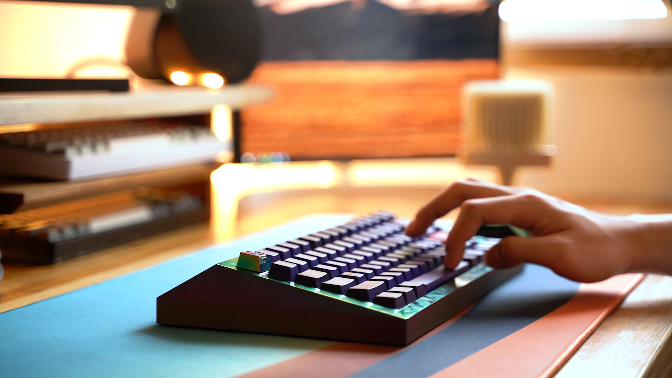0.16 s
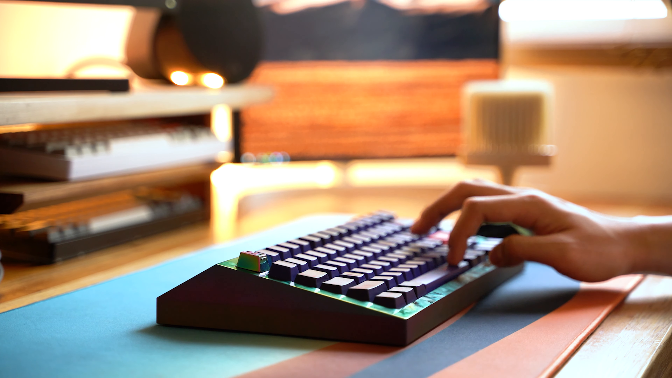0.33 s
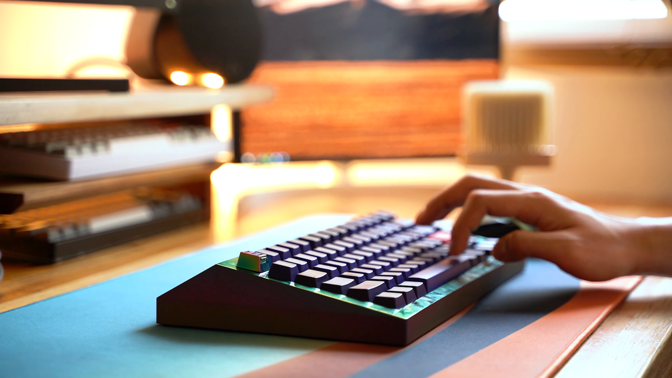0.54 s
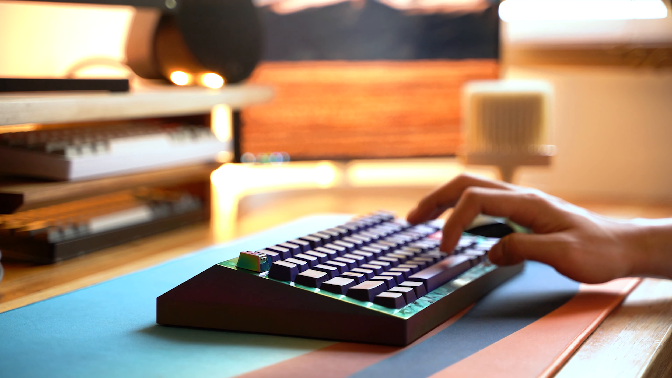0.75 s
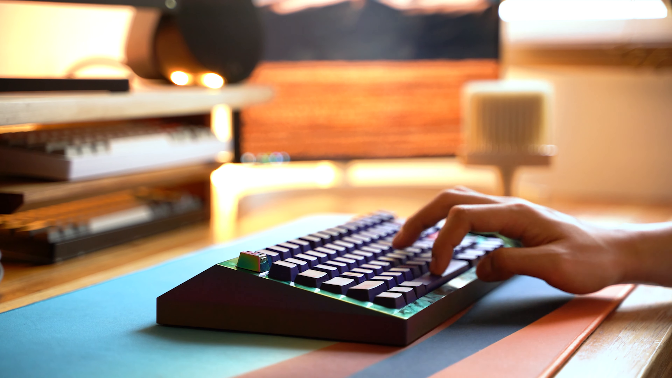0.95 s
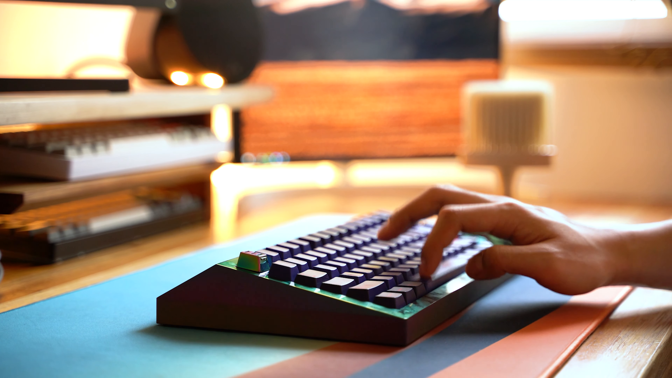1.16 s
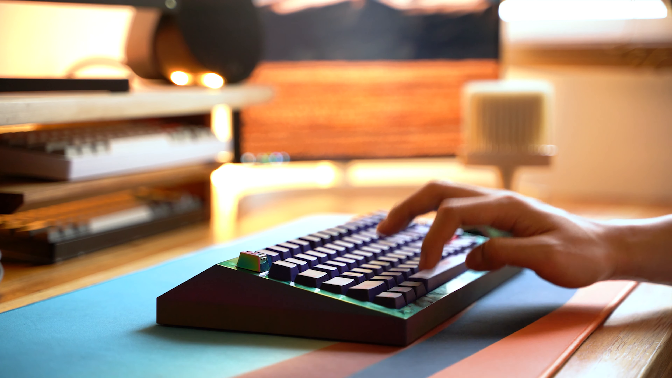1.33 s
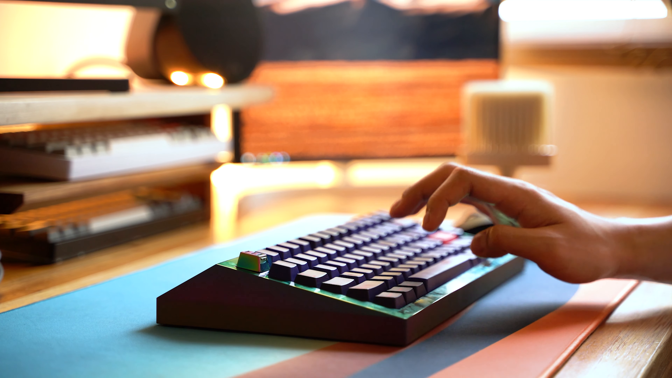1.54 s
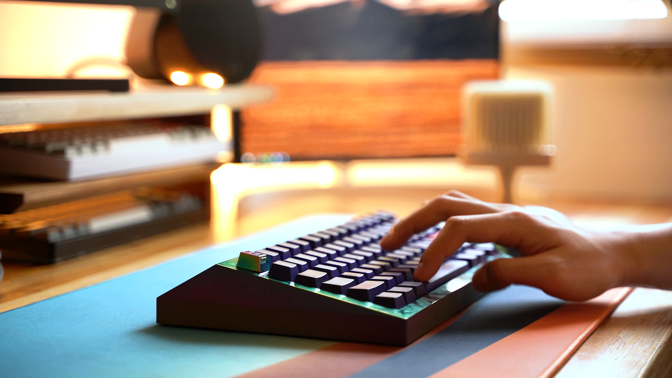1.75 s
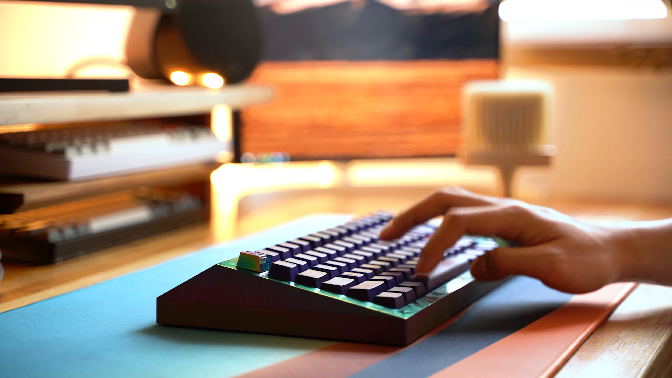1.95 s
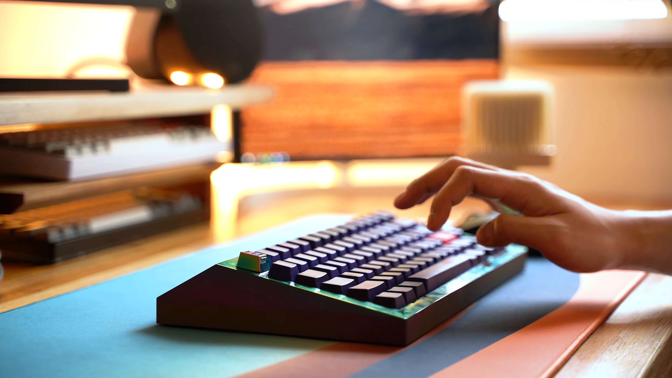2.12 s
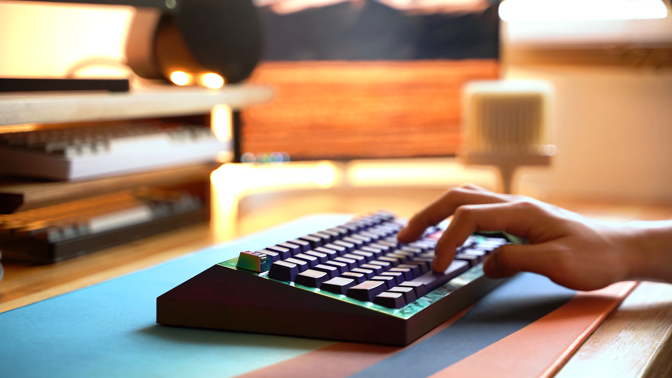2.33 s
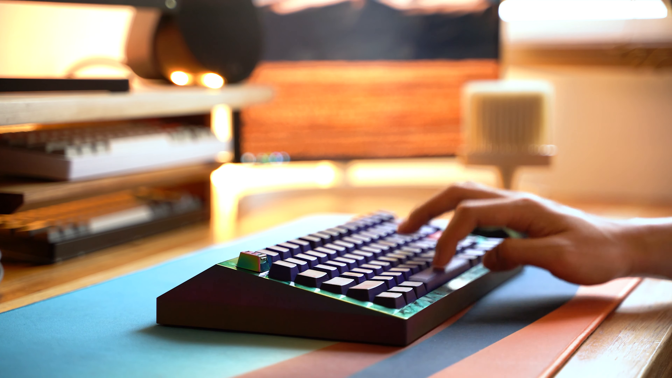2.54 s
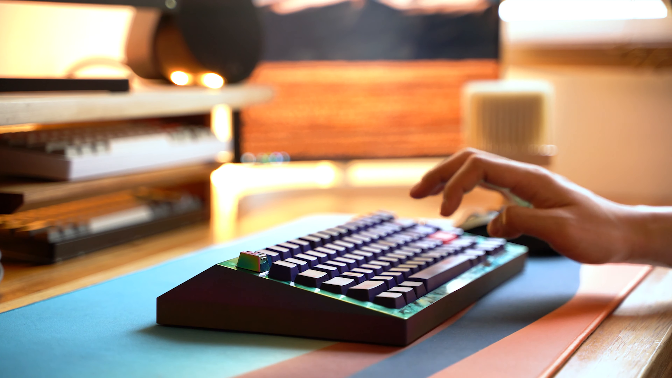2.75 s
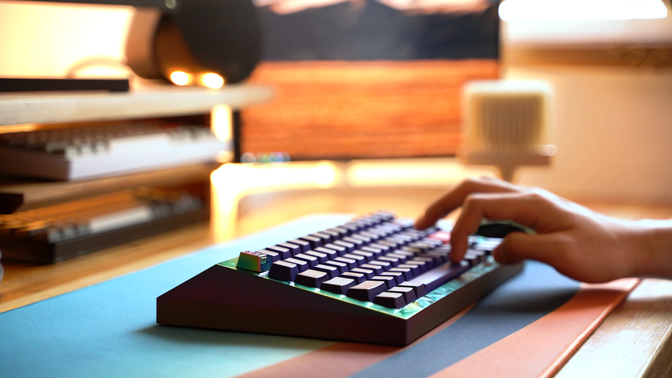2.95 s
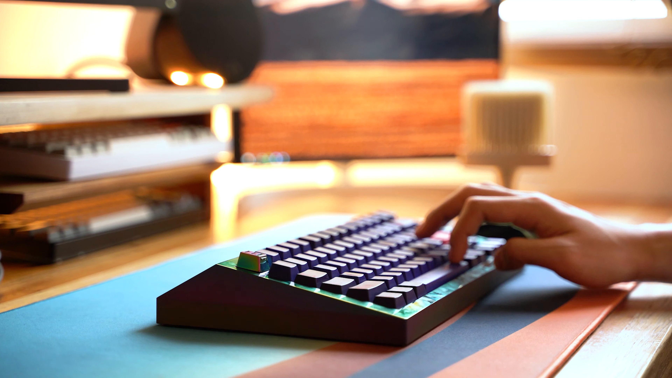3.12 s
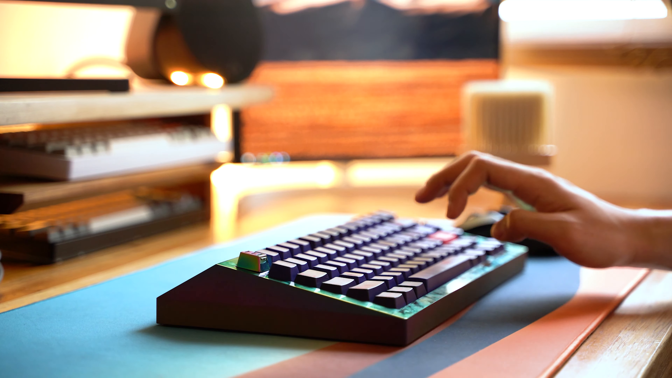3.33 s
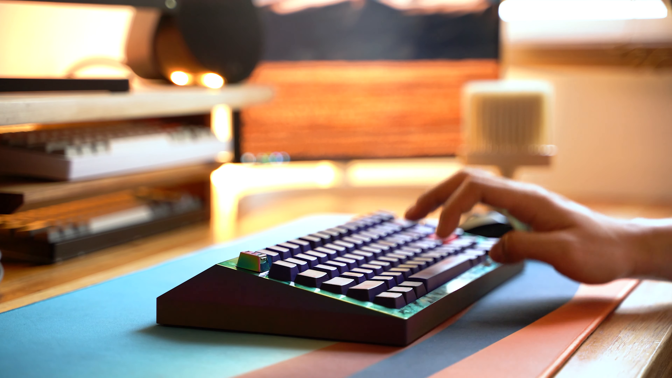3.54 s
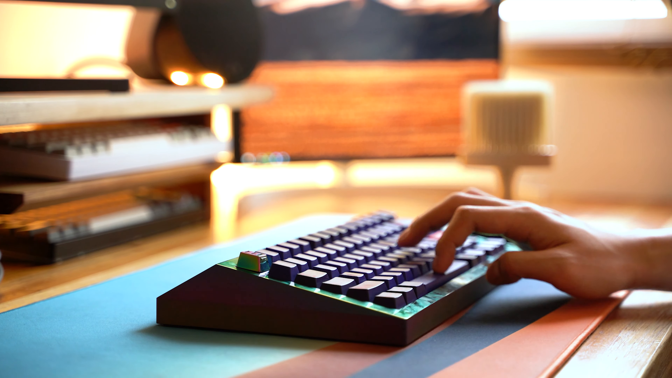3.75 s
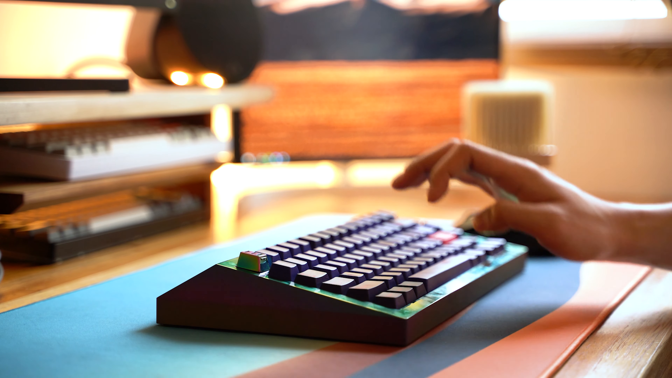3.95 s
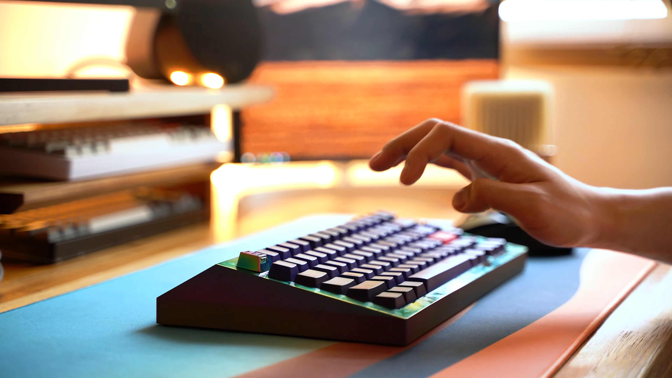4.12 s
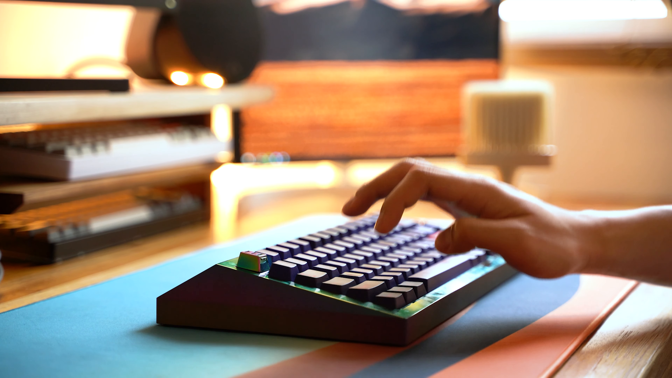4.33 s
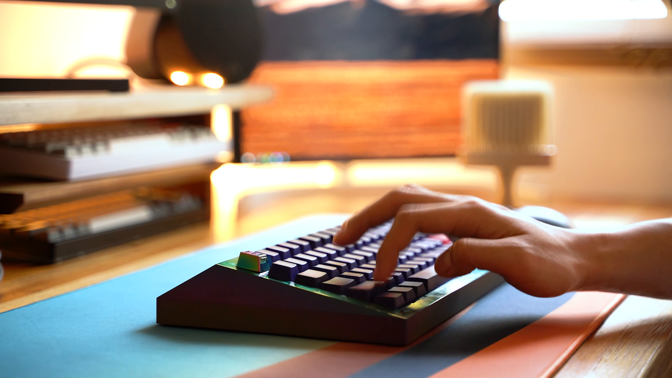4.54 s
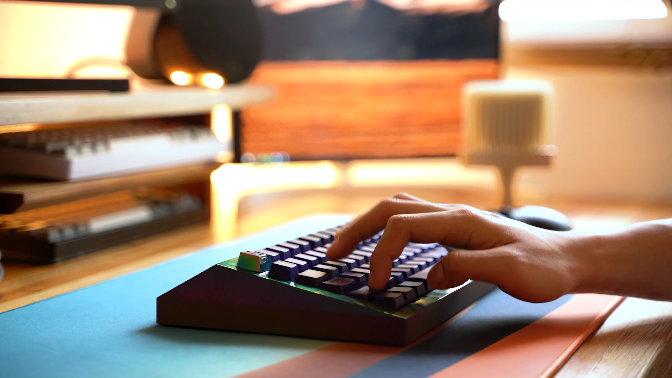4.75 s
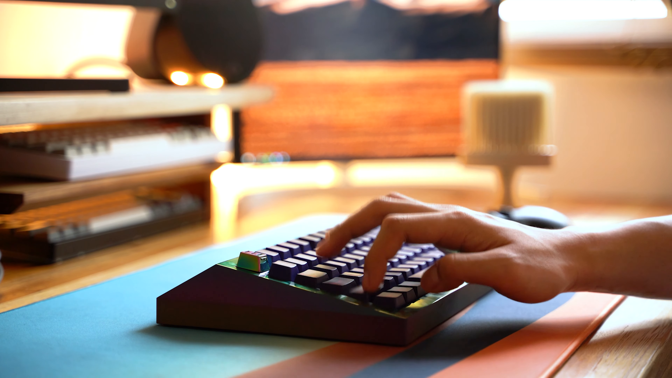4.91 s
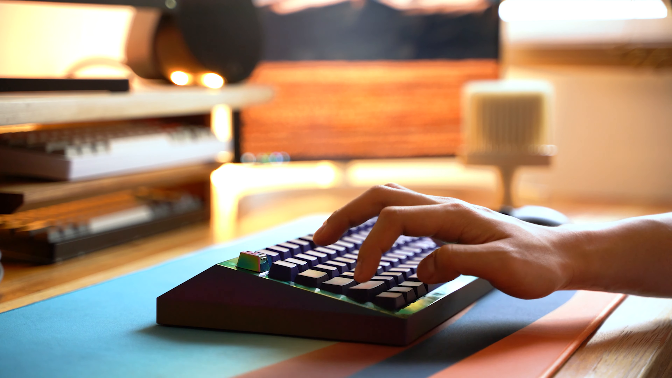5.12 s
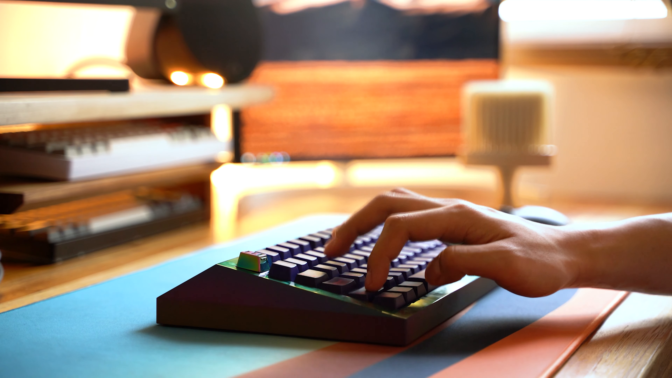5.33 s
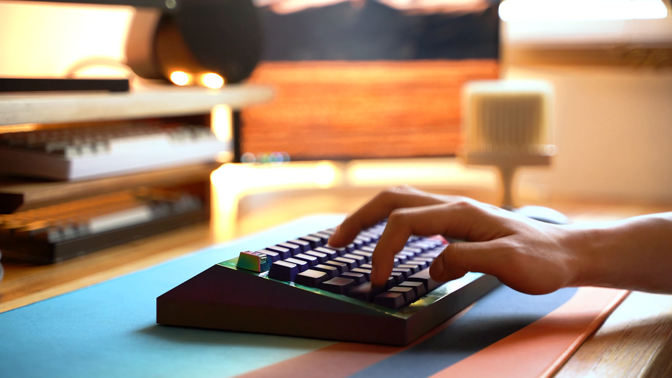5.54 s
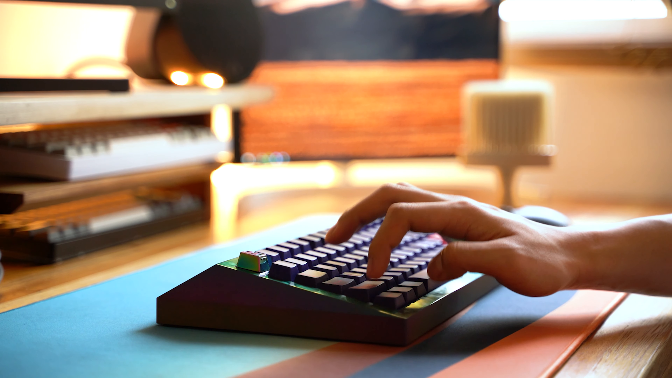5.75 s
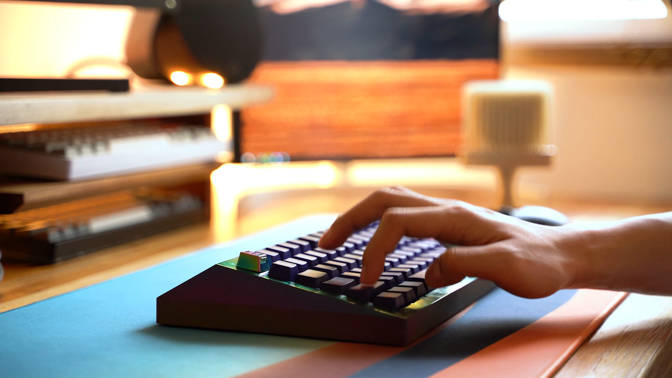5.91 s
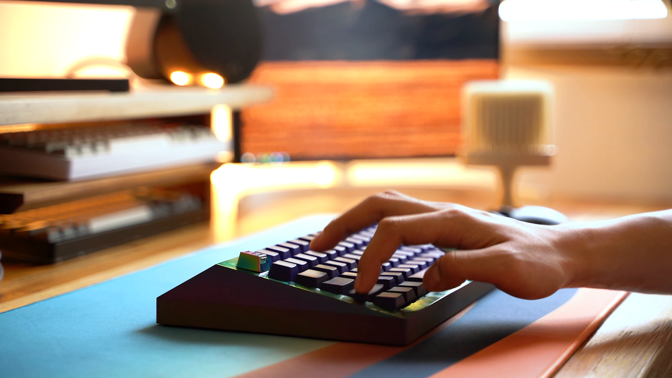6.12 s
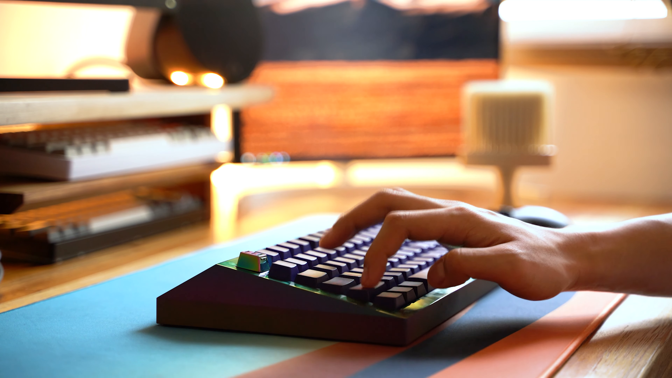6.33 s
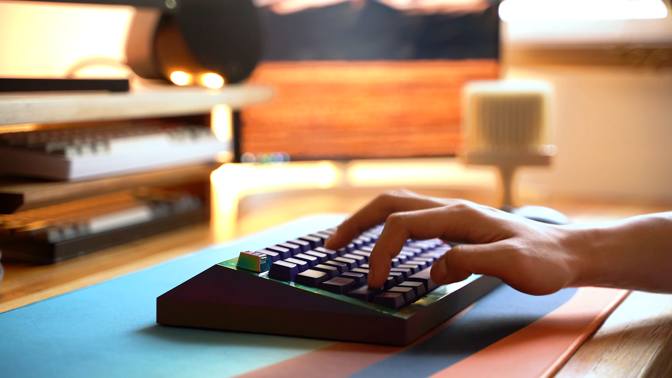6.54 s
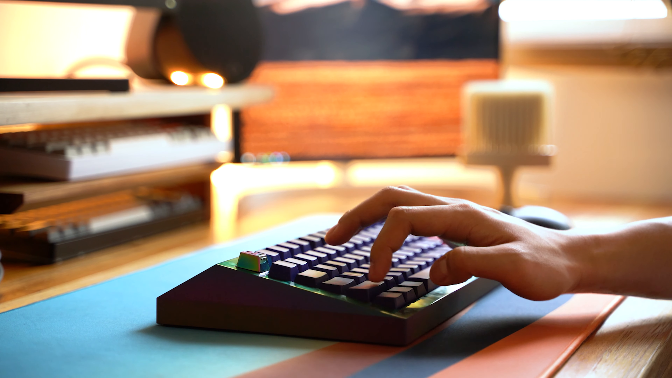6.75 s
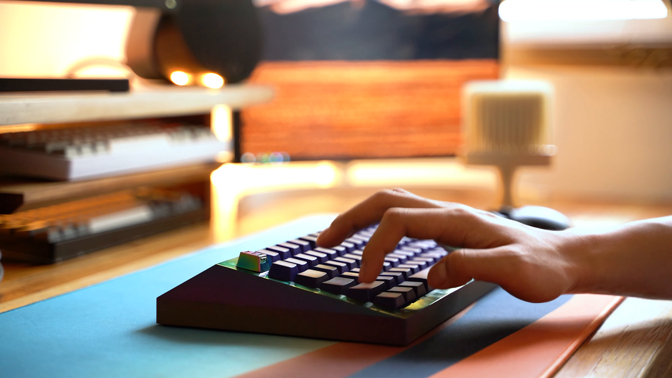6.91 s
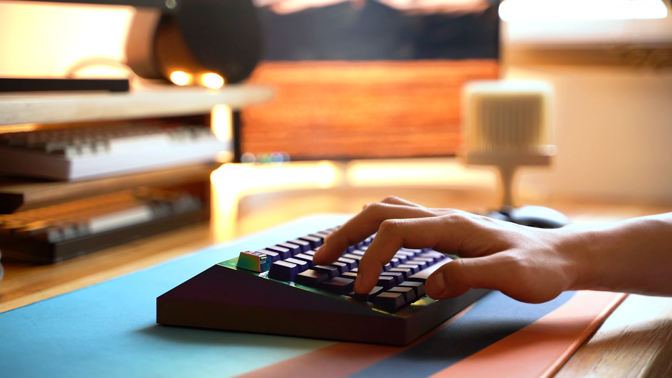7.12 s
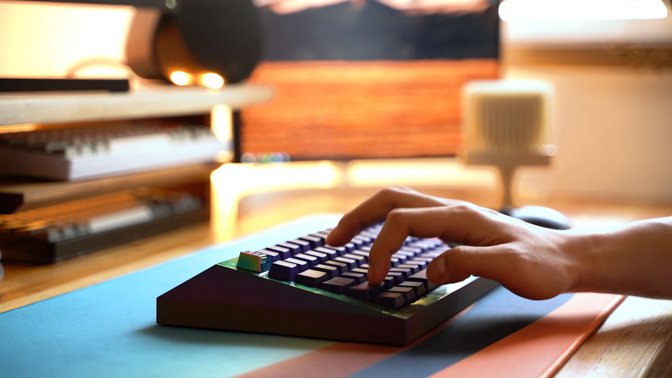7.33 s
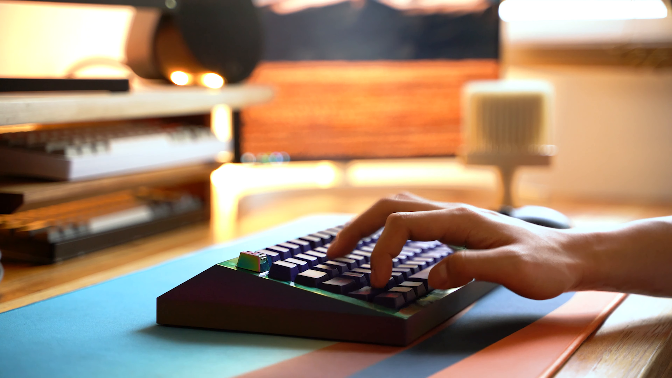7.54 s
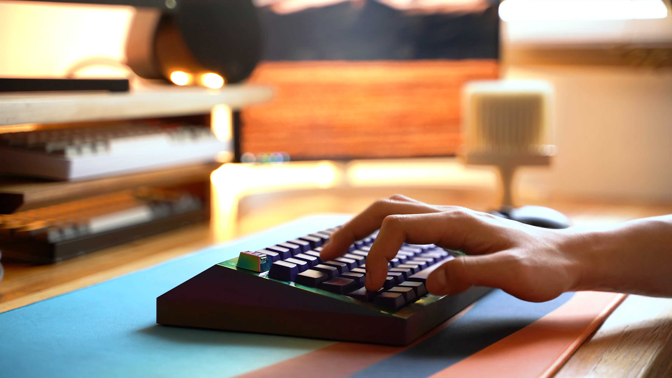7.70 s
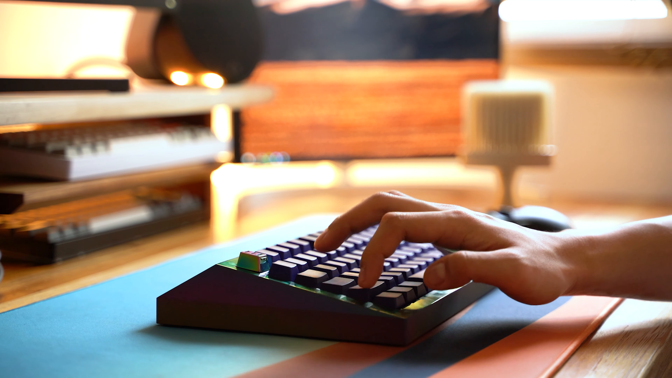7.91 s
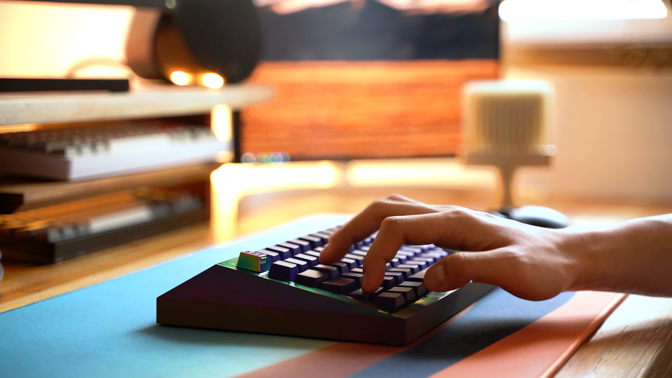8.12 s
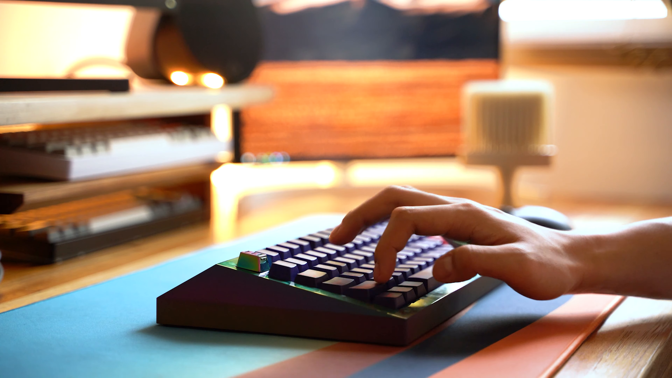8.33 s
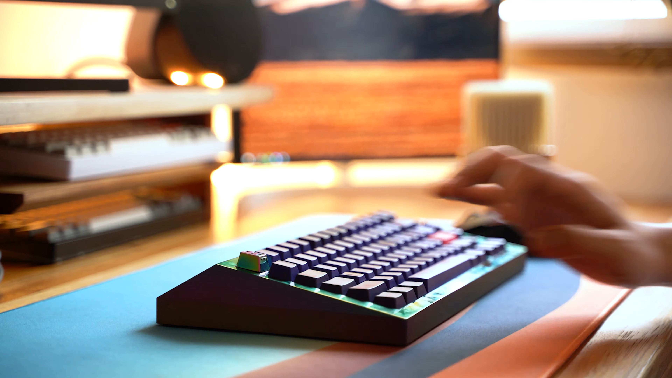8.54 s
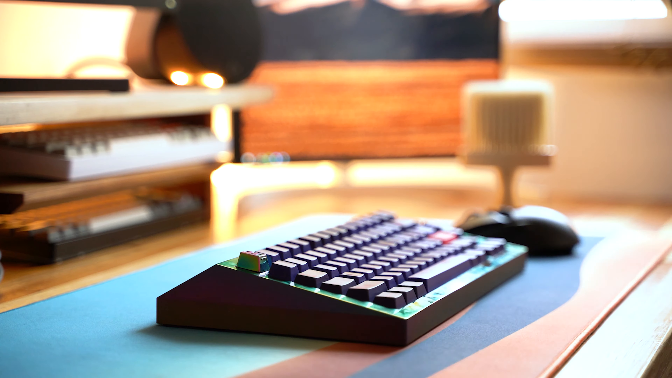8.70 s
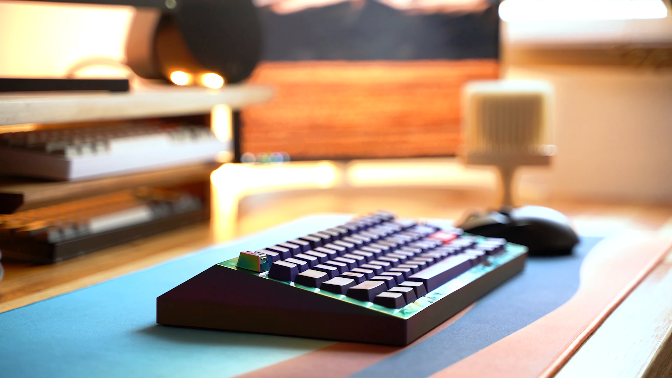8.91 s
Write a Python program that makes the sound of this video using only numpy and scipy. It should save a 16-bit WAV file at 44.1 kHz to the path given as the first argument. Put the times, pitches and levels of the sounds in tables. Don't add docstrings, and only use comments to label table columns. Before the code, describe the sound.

A close, clean capture of a mechanical keyboard on a desk mat in a small quiet room, with very faint low air noise and fan hum throughout. From 0 to about 1.5 seconds one wide key is struck steadily, roughly six times a second, each stroke a loud, hollow, woody clack with a slightly lower, rattly release click between. Then pairs of the same strokes come at about 1.9, 2.45, 3.1 and 3.7 seconds, separated by short gaps, the third pair softer on the way down. After a pause from 4 to 4.5 seconds, letter keys are typed one after another at nearly seven per second until 8.5 seconds: noticeably quieter, lighter and crisper ticks, varying from key to key, some with a metallic clack or thin spring ring. A firmer release click with a bounce ends it near 8.6 seconds, leaving quiet room air.

```python
import sys
import numpy as np
from scipy import signal
from scipy.fft import rfft, irfft
from scipy.io import wavfile
from scipy.ndimage import uniform_filter1d

SR = 44100
rng = np.random.default_rng(int(sys.argv[2]) if len(sys.argv) > 2 else 0)


def wav_record(signal):
    frames = np.transpose(np.atleast_2d(signal))
    bounded = np.clip(frames, -1, 1)
    quanta = np.round(bounded * 32767).astype(np.int16)
    wavfile.write(sys.argv[1], SR, quanta)


def linear_from_db(decibels):
    return 10 ** (np.asarray(decibels, float) / 20)


N = 395577
LEAD = 8192

# f/Hz, level/dB, T60/s
WIDE_MODES = [
    [(417, -28.5, 0.046), (1430, -14, 0.041), (1680, 12.5, 0.0063), (1853, 6.5, 0.0075), (2090, -15, 0.015)],
    [(678, -18.5, 0.039), (875, 3.5, 0.0086), (1050, 11.5, 0.0095), (3460, -15.5, 0.032)],
    [(2810, -8.5, 0.012), (3412, -2.5, 0.007), (4580, -5.5, 0.0048)],
    [(6400, -19.5, 0.017), (6620, -11.5, 0.02), (8540, -10, 0.0094), (10300, -7, 0.006)],
]
WIDE_RISE_S = [0.0008, 0.0011, 0.0004, 0.0003]
# t/s, level/dB, case/dB, extra stem/dB, edge/dB (case and edge relative to the cap)
WIDE_PRESSES = [(-0.045, -12, -14, -2, -10.5), (0.1106, -16.5, -14.5, 2.7, -12),
                (0.2776, -17, -12.5, -0.5, -11), (0.432, -18, -11.5, 2, -10), (0.5951, -17, -11.5, 1, -12),
                (0.7535, -14, -17, -2.2, -11.5), (0.9228, -15.5, -15, -0.2, -13.5),
                (1.0743, -15.5, -14.5, 0.9, -17), (1.2463, -14, -16.5, 0.5, -19.5),
                (1.3892, -13.5, -15.5, 1.5, -18), (1.8568, -10, -16, -1.4, -16),
                (2.0235, -12.5, -15, 1.3, -18.5), (2.44, -12.5, -14.5, 2.1, -12),
                (2.6055, -14, -15, 3.5, -15.5), (3.0944, -19.5, -11, 1, -13), (3.2357, -19, -11, -1.4, -16),
                (3.723, -10.5, -15, 0.1, -13.5), (3.8676, -12.5, -16, 0.3, -13.5)]
# t/s, level/dB, case/dB, extra stem/dB, edge/dB
WIDE_RELEASES = [(0.044, -26, -5.5, -1.2, -8.5), (0.1875, -16.5, -8, 1.5, -6), (0.348, -25.5, -1, 1, -1),
                 (0.504, -26.5, -5, 3.5, -1.5), (0.6656, -28.5, -3.5, 1, -1.5),
                 (0.8272, -12, -12, -4.5, -12), (1.0015, -28.5, -6, -1.5, -8.5),
                 (1.1548, -19.5, -7, 1.8, -7), (1.3094, -31.5, 3, 3.5, 3.5), (1.4617, -11.5, -12, 2.6, -12),
                 (1.931, -21, -5, -1.5, -3), (2.0974, -17.5, -8, -0.8, -8.5),
                 (2.521, -16.5, -9.5, -3, -11.5), (2.6839, -15.5, -6.5, -6.5, -5.5),
                 (3.1627, -27.5, -4, -5, -12), (3.3216, -11.5, -13, -3.5, -11.5),
                 (3.8023, -14.5, -11.5, -5.5, -8.5), (3.9545, -16, -8, -0.3, -7)]
# t/s, level/dB, edge/dB
WIDE_TOUCHES = [(0.0294, -48, -6), (0.1037, -61, -16), (0.179, -46, -14.5), (0.2595, -54, -1),
                (0.2727, -44, -8), (0.3363, -48, -5), (0.426, -48.5, -1), (0.4955, -48, -6),
                (0.5869, -44.5, -15), (0.747, -42.5, -14), (0.816, -46.5, -9.5), (0.9066, -50, 0),
                (0.918, -41, -18), (0.9873, -53, 7), (1.0572, -49.5, 0.5), (1.1449, -40.5, -17.5),
                (1.2297, -49, 4.5), (1.2422, -42.5, -14.5), (1.3007, -45, -9.5), (1.371, -48.5, -0.5),
                (1.3846, -46, -3.5), (1.846, -45, -0.5), (2.009, -44.5, -4), (2.426, -48.5, -12),
                (2.589, -54.5, -15), (3.077, -51, -3), (3.151, -45.5, 1), (3.307, -52, 1), (3.714, -48, -7),
                (3.9476, -45, -12)]
# t/s, level/dB
WIDE_REBOUNDS = [(0.1925, -27.5), (0.3532, -33), (0.5122, -31), (0.6708, -33), (0.8325, -28), (1.0066, -34),
                 (1.3165, -31.5), (1.4686, -24.5), (1.9364, -23), (2.1027, -25), (2.6906, -17),
                 (3.1668, -32), (3.3265, -27.5), (3.8077, -34), (3.9625, -29.5)]
# usual level/dB, case/dB, stem/dB, edge/dB, rattle/dB
WIDE_COLOUR = dict(press=(-16, -13, -9.5, -16, -27), release=(-21, -6, -8, -6, -10),
               touch=(-43, 1, 2, -8.5, -6), rebound=(-32, -4.5, -10, -12.5, -9))


def wide_key():
    down, up = typing(WIDE_PRESSES, WIDE_RELEASES, WIDE_TOUCHES, WIDE_REBOUNDS, WIDE_COLOUR)
    return strokes(down, up, WIDE_MODES, WIDE_RISE_S, late_s=-.0001, up_pitch=0.929, spread_db=2.2, tick_db=-64)


# f/Hz, level/dB, T60/s
LETTER_MODES = [
    [(388, -14.5, 0.054), (1710, -8.5, 0.0022), (1872, 11.5, 0.012), (1994, 10, 0.018)],
    [(712, 1, 0.0073), (876, 4.5, 0.016), (1186, 0.5, 0.024), (1247, 4.5, 0.01)],
    [(2797, -7.5, 0.015), (3440, -13.5, 0.014), (4343, -7.5, 0.0046), (5020, -12, 0.0076)],
    [(5430, 3.5, 0.01), (5670, -12, 0.027), (6160, 10, 0.018), (8500, -9, 0.015), (10040, -6.5, 0.015)],
]
LETTER_RISE_S = [0.00035, 0.00035, 0.00015, 0.00012]
# t/s, level/dB, case/dB, extra stem/dB, edge/dB
LETTER_PRESSES = [(4.546, -25, -5.5, -1.7, -3.5), (4.7016, -29.5, -6, -4, -4.5),
                  (4.8399, -31.5, -4, 1.7, -4.5), (4.9913, -36.5, -4, 4.5, -3),
                  (5.157, -27.5, -17, -1.3, -6.5), (5.315, -30, -17, -4.5, -11),
                  (5.4691, -28.5, -5, -3, -11.5), (5.6155, -27.5, -15, 0.5, -10),
                  (5.7741, -27, -11, -2.8, -6.5), (5.9222, -29, -4.5, 0.5, -3),
                  (6.0845, -30, -18, -1.8, -15), (6.2174, -33.5, -14, -5, -18),
                  (6.3596, -31.5, -18, 3.5, -15), (6.5008, -32.5, -2.5, -2, -8),
                  (6.6394, -25, -14, -0.9, -9), (6.7943, -21, -20, -3.5, -5.5), (6.942, -34.5, -2, 1, 2.5),
                  (7.0978, -28.5, -17, 0.5, -6.5), (7.25, -30, -16, -3.8, -12), (7.394, -29, -4.5, 0.5, -8),
                  (7.527, -25.5, -11, 0, -10), (7.6708, -24, -14.5, 1.2, -5), (7.818, -30.5, -2.5, 1.5, -4),
                  (7.9642, -36, -10, -2, -5), (8.1133, -38.5, -11, 4.5, -12), (8.252, -30, -1.5, -2.5, -3),
                  (8.4018, -28, -13, -0.7, -8), (8.5083, -24.5, -8.5, -3.6, -11)]
# t/s, level/dB, case/dB, extra stem/dB, edge/dB
LETTER_RELEASES = [(4.609, -22.5, -6.5, 2.2, -12), (4.7688, -32.5, -2, 4, -5.5),
                   (4.918, -36, -3.5, -1.5, -12), (5.068, -28.5, -2, 2.5, -19), (5.23, -30.5, -3, 2, -19),
                   (5.3798, -28.5, -5, -1.5, -18), (5.5418, -37.5, -2, -2, -11.5),
                   (5.6914, -37, -3, 1.5, -7), (5.8447, -34, -3, 1, -4), (5.9993, -35, -4, 0.1, -17),
                   (6.2894, -50.5, 2.5, -4, -33), (6.429, -38.5, -3, -3.5, -17),
                   (6.5695, -40, -0.5, 0.5, -11), (6.7015, -28, -5.5, 1.5, -8.5),
                   (6.87, -39.5, -2, 3.5, -6), (7.0138, -33, -2.5, 0.1, -19), (7.193, -61, 3, -3, -37),
                   (7.31, -26.5, -4, 0.1, -15.5), (7.4785, -45, -0.5, 0.5, -15),
                   (7.5924, -37.5, -2.5, 1.5, -8), (7.7433, -36, 0, 3, -3.5),
                   (7.8853, -32.5, -4.5, -2, -19), (8.0487, -42.5, -2, -1, -21),
                   (8.176, -25.5, -3.5, 3.3, -14), (8.318, -32, -2.5, 1, -6.5),
                   (8.463, -38.5, -2, -1.5, -9), (8.563, -19.5, -9, 2.8, -9.5)]
# t/s, level/dB, edge/dB
LETTER_TOUCHES = [(4.539, -46, -14), (4.6804, -50.5, -7), (4.8212, -48.5, -14), (4.969, -55.5, -1),
                  (5.2898, -54, -12), (5.447, -54, -8), (5.463, -56, 3), (5.5935, -52, 0),
                  (5.7545, -50, -10), (5.9048, -52, -5), (6.144, -61, 1), (6.269, -62, 1),
                  (6.4948, -51, -12), (6.615, -52, -4), (6.7814, -45, -14), (6.9215, -57, 6),
                  (6.9362, -58, 3), (7.372, -60, 2), (7.5236, -64, -5), (7.6527, -51, -7),
                  (7.7992, -53.5, -7), (7.9432, -54, -7), (8.163, -59, 2), (8.2476, -50, -12),
                  (8.311, -56, -11), (8.3835, -50.5, 1)]
# t/s, level/dB
LETTER_REBOUNDS = [
    (4.6133, -31.5),
    (4.7717, -31.5),
    (5.8487, -37),
    (6.0023, -46),
    (6.7041, -37),
    (7.3147, -42),
    (8.1795, -40),
    (8.5663, -23),
]
# usual level/dB, case/dB, stem/dB, edge/dB, rattle/dB
LETTER_COLOUR = dict(press=(-25.5, -10, 3, -10, -58), release=(-41.5, -2, -5, -13, -15.5),
                 touch=(-65, 1.5, -3, 9, -10.5), rebound=(-30, -6, -12.5, -43.5, -34))


def letter_keys():
    down, up = typing(LETTER_PRESSES, LETTER_RELEASES, LETTER_TOUCHES, LETTER_REBOUNDS, LETTER_COLOUR)
    return strokes(down, up, LETTER_MODES, LETTER_RISE_S, late_s=.0005, up_pitch=0.94, spread_db=3.3, tick_db=-68)


PRESS_LAW = [-.1, 0.56, -0.19, -.3, -0.057]
RELEASE_LAW = [-0.36, -.35, -0.64, -0.21, 0.0000022]
SOFT_LAW = [-0.13, 0.73, -0.31, 0.37, 0.75]


def typing(presses, releases, touches, rebounds, colour):
    down = knocks_of(presses, colour["press"], PRESS_LAW) + knocks_of(touches, colour["touch"], SOFT_LAW)
    up = knocks_of(releases, colour["release"], RELEASE_LAW) + knocks_of(rebounds, colour["rebound"], RELEASE_LAW)
    return down, up


def knocks_of(rows, colour, law):
    usual_db, *rest_db = colour
    *slopes, follow = law
    out = []
    for s, db, *own in rows:
        case, stem, edge, loose = np.add(rest_db, np.multiply(slopes, db - usual_db))
        bright = own[-1] if own else edge
        case, extra = own[:2] if len(own) > 1 else (case, 0)
        out.append((s, db, case, stem + extra + follow * (bright - edge), bright, loose))
    return out


def strokes(down, up, parts, rise_s, late_s, up_pitch, spread_db, tick_db):
    lifted = [[(hz * up_pitch, db, t60) for hz, db, t60 in parts[0]], *parts[1:]]
    pressed = key(down, parts, rise_s, late_s, spread_db, .012, tick_db)
    return pressed + key(up, lifted, rise_s, late_s, spread_db, .012, tick_db)


PART_DB = [3.5, 3, 0, -9]
# low f/Hz, high f/Hz, T60/s, level/dB against the clear modes
CRACK = [(2540, 4820, 0.007, 0), (4170, 13200, 0.0072, 6)]
TICK_LEAD_S = [.006, .0125]
MIDDLE_RELEASES_S = np.array([1.1547, 1.4617, 1.4686, 2.521, 3.8025])
MIDDLE_PITCH = 0.89
SLIDE_DB, SLIDE_S = -29.5, 0.0021


def key(knocks, parts, rise_s, late_s, spread_db, detune, tick_db):
    out = np.zeros((2, LEAD + N))
    colour = rng.standard_normal((len(knocks), 4, 14))
    loose = rng.random((len(knocks), 16))
    white = rng.standard_normal((len(knocks), 3, 2048))
    white[:, :2, 3] = 3.0
    cracks = [linear_from_db(db) * crack(white[:, k], lo, hi, t60) for k, (lo, hi, t60, db) in enumerate(CRACK)]
    slides = linear_from_db(SLIDE_DB) * crack(white[:, 2], 900, 5500, np.log(1000) * SLIDE_S)[:, 1023::-1]
    clicks = all_round(parts, rise_s, blur=0.85)
    for k, (s, cap_db, *rest_db, rattle_db) in enumerate(knocks):
        gains = linear_from_db(cap_db + np.array([0, *rest_db]) + PART_DB)
        middle = np.abs(MIDDLE_RELEASES_S - s).min() < .003
        struck = [np.multiply(parts[0], [MIDDLE_PITCH if middle else 1, 1, 1]), *parts[1:]]
        cap, case, stem, edge = (ring(m, up, c, spread_db, detune) for m, up, c in zip(struck, rise_s, colour[k]))
        heavy = gains[0] * cap + gains[1] * case
        light = gains[2] * (stem + cracks[0][k]) + gains[3] * (edge + cracks[1][k])
        soft, hard = (rattle(min(rattle_db, -5) + db, loose[k], count=8) for db in (0, 6))
        sound = np.convolve(heavy, soft) + np.convolve(light, hard)
        at = LEAD + int((s + late_s) * SR)
        out[0, at:at + len(sound)] += sound
        out[0, at - 1024:at] += gains[0] * slides[k]
        if cap_db > tick_db + 25:
            release = rest_db[0] > -6.2
            early = at - int(TICK_LEAD_S[release] * (1 + .08 * colour[k, 3, 5]) * SR)
            out[:, early:early + 2048] += linear_from_db(tick_db + 3 * colour[k, 3, 6]) * cracks[1][k - 1]
        power = np.repeat([np.linalg.norm(soft), np.linalg.norm(hard)], 2)
        out[1, at:at + 2048] += (gains * power) @ clicks
    return out


def ring(modes, rise_s, chance, spread_db, detune):
    t = np.arange(2048)[:, None] / SR
    hz, db, t60 = np.transpose(modes)
    n = len(modes)
    decay = np.exp(-np.log(1000) * t / t60)
    swing = np.sin(2 * np.pi * hz * (1 + detune * chance[:n]) * t) * decay
    y = (swing @ linear_from_db(db + spread_db * chance[-n:])) * (1 - np.exp(-(t[:, 0] / rise_s) ** 2))
    return y / np.abs(y).max()


def crack(white, lo_hz, hi_hz, t60):
    t = np.arange(white.shape[1]) / SR
    y = signal.sosfilt(signal.butter(2, [lo_hz, hi_hz], "band", fs=SR, output="sos"), white)
    y = y * np.exp(-np.log(1000) * t / t60) * (1 - np.exp(-t / 0.000082))
    return y / np.abs(y).max(axis=1, keepdims=True)


def rattle(db, chance, count):
    taps = np.zeros(600)
    lag_s = .0022 + 0.0063 * chance[:count] ** 1.7
    strength = (2 * chance[count:] - 1) * np.exp(-lag_s / .006) * linear_from_db(db + 3)
    np.add.at(taps, np.minimum(lag_s * SR, 599).astype(int), strength)
    taps[0] = 1
    return taps


ALL_ROUND_DB = [1.2, 3.6, 7.2, 14]


def all_round(parts, rise_s, blur):
    still, spike = np.zeros(14), np.eye(1, 2048, 2)
    blurred = [[(hz, db, blur * t60) for hz, db, t60 in modes] for modes in parts[:2]]
    heavy = [ring(modes, up, still, 0, 0) for modes, up in zip(blurred, rise_s)]
    light = [(-1) ** k * crack(spike, lo, hi, t60)[0] for k, (lo, hi, t60, db) in enumerate(CRACK)]
    return linear_from_db(np.array(ALL_ROUND_DB))[:, None] * (heavy + light)


# f/Hz, level/dB, T60/s
DESK = [(411, 2, 0.059), (413, -10.5, 0.02)]


def desk_thump():
    wide = [(s, db - 30.5) for s, db, *_ in WIDE_PRESSES]
    letters = [(s, db - 37.5) for s, db, *_ in LETTER_PRESSES]
    thump = bottom_out(wide, DESK, rise_s=.002, spread_db=5, wall_db=4.5)
    return thump + bottom_out(letters, DESK, rise_s=.002, spread_db=3, wall_db=-3)


# f/Hz, level/dB, T60/s
PLATE = [(3900, 1, 0.0054), (4600, 13, 0.007), (4980, -3, 0.0075)]
# t/s, level/dB
PLATE_CLACKS = [
    (4.9921, -32.5),
    (5.158, -36),
    (5.316, -34),
    (6.9415, -24.5),
    (7.0983, -43),
    (7.9644, -30),
]


def plate_clack():
    return bottom_out(PLATE_CLACKS, PLATE, rise_s=0.0002, spread_db=-14, wall_db=3)


# f/Hz, level/dB, T60/s
SPRING = [(5020, 0, .065), (5110, -1, .06), (5230, -3, .05)]
# from t/s, to t/s, ring level/dB against the cap
LIVELY_KEYS = [(4.5, 4.95, -30), (4.98, 5.42, -19), (5.45, 6.05, -32), (6.07, 6.9, -24), (6.93, 7.12, -22),
               (7.2, 7.49, -28), (7.5, 7.7, -21), (7.72, 7.93, -21), (7.95, 8.2, -16), (8.23, 8.48, -22),
               (8.5, 8.6, -17)]


def spring_ring():
    lively = []
    for s, db, *_ in LETTER_PRESSES + LETTER_RELEASES:
        lively += [(s, db + ring_db) for start, end, ring_db in LIVELY_KEYS if start < s < end]
    return bottom_out(lively, SPRING, rise_s=0.0002, spread_db=3, wall_db=-3)


def bottom_out(hits, modes, rise_s, spread_db, wall_db):
    out = np.zeros((2, LEAD + N))
    for (s, db), chance in zip(hits, rng.standard_normal((len(hits), 6))):
        at = LEAD + int((s + .0002) * SR)
        out[:, at:at + 2048] += linear_from_db([[db], [db + wall_db]]) * ring(modes, rise_s, chance, spread_db, .006)
    return out


# f/Hz, level/dB, T60/s
ROOM = [(467.5, -25.5, 0.057), (706, -25, 0.089), (990, -27.5, 0.23), (1680, -42, 0.3), (2820, -21.5, 0.23),
        (3860, -30, 0.22), (7040, -19.5, 0.089), (10000, -12, 0.055), (15000, -11, 0.18)]
ROOM_BUILD_S = 0.0096


def room(x, count):
    t = np.arange(SR // 2) / SR
    answer = np.zeros((count, len(t)))
    for hz, db, t60 in ROOM:
        hiss = band(band(rng.standard_normal(answer.shape), hz, hz * 1.0), hz, hz * 1.0)
        answer += linear_from_db(db - 33.5) * hiss / np.sqrt(hz * .5 / SR) * np.exp(-np.log(1000) * t / t60)
    answer *= 1 - np.exp(-(t / ROOM_BUILD_S) ** 2)
    place = rng.standard_normal((count, len(x) // 2048 + 1))
    place = np.repeat(place / np.linalg.norm(place, axis=0), 2048, axis=1)
    place = uniform_filter1d(place, 256)[:, :len(x)]
    return signal.fftconvolve(place * x, answer, axes=1).sum(axis=0)[:len(x)]


# f/Hz, level/(dB per Hz)
AIR = [(25, -36.5), (42, -35), (80, -28.5), (130, -4.5), (175, -10), (260, -11.5), (400, -14.5),
       (700, -19.5), (1500, -25.5), (2200, -32.5), (3500, -36), (8000, -40.5), (16000, -40)]
# f/Hz, width/Hz, rms level/dB
FAN = [(59.4, 6.5, -90.5), (132, 20, -85.5), (209.6, 14, -72.5)]


def air():
    hz, db = np.transpose(AIR)
    f = np.maximum(np.arange(N // 2 + 1) * SR / N, 1)
    hiss = irfft(rfft(rng.standard_normal(N)) * linear_from_db(np.interp(np.log(f), np.log(hz), db)), N)
    sway_db = uniform_filter1d(np.repeat(rng.standard_normal(N // 8192 + 1), 8192), 8192)[:N]
    tones = sum(level(band(band(rng.standard_normal(N), f0, w), f0, w), tone_db) for f0, w, tone_db in FAN)
    return level(hiss, -68.5) * linear_from_db(sway_db) + tones


def band(x, hz, width):
    return signal.lfilter(*signal.iirpeak(hz, hz / width, fs=SR), x)


def level(x, db):
    return x * linear_from_db(db) / np.sqrt(np.mean(x ** 2))


def cut(x, hz, width, db, count):
    a, w = linear_from_db(db / count / 2), 2 * np.pi * hz / SR
    k = np.sin(w) * width / hz / 2
    for _ in range(count):
        x = signal.lfilter([1 + k * a, -2 * np.cos(w), 1 - k * a], [1 + k / a, -2 * np.cos(w), 1 - k / a], x)
    return x


def gate(x, lo_hz, hi_hz, floor_db, size):
    top = signal.sosfiltfilt(signal.butter(6, [lo_hz, hi_hz], "band", fs=SR, output="sos"), x)
    power = uniform_filter1d(top ** 2, 2 * size)[::size]
    limit_db = floor_db + 1.6 * rng.standard_normal(len(power))
    shut = np.repeat(power < linear_from_db(2 * limit_db), size)[:N]
    return x - top * uniform_filter1d(shut * 1., size // 2)


def scene():
    keys = wide_key() + letter_keys() + desk_thump() + plate_clack() + spring_ring()
    near, far = signal.sosfilt(signal.butter(4, 300, "high", fs=SR, output="sos"), keys)
    return ((near + room(far, count=3))[LEAD:] + air())[None]


def roll_off(x):
    return signal.sosfilt(signal.butter(12, 17000, fs=SR, output="sos"), x)


# f/Hz, width/Hz, level/dB
CUTS = [(483, 45, -21.5), (531, 80, -20), (2406, 170, -37.5), (3124, 37, -35), (2990, 62, -38)]
GATE_EDGES_HZ = [12200, 13000, 13900, 14900, 16000, 17200]
GATE_DB = [-93.5, -92, -91, -91, -80]


def record(dry):
    for hz, width, db in CUTS:
        dry = cut(dry, hz, width, db, count=3)
    dry = signal.sosfilt(signal.ellip(8, .2, 60, 16500, fs=SR, output="sos"), dry)
    for lo, hi, floor_db in zip(GATE_EDGES_HZ, GATE_EDGES_HZ[1:], GATE_DB):
        dry = gate(dry[0], lo - 200, hi + 200, floor_db, size=1024)[None]
    return roll_off(dry)


dry = scene()
out = record(dry)
wav_record(out)
```